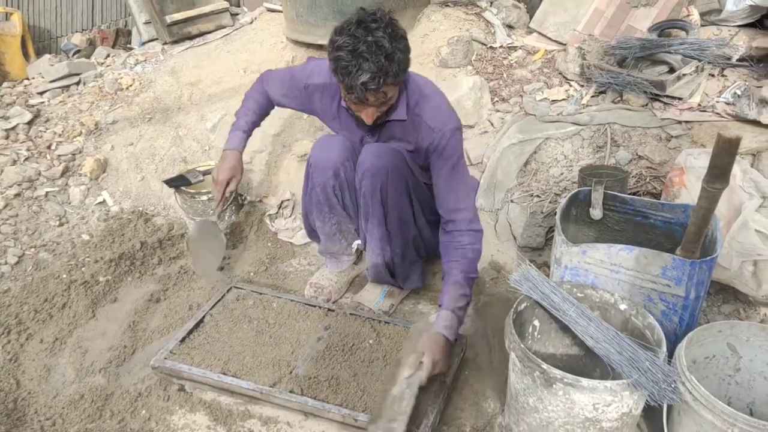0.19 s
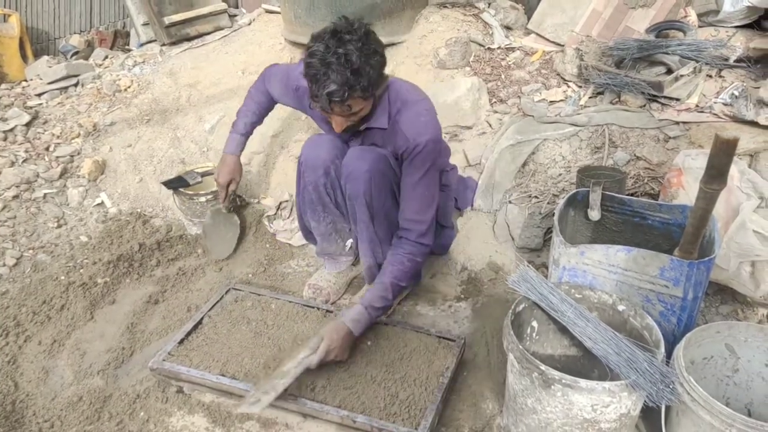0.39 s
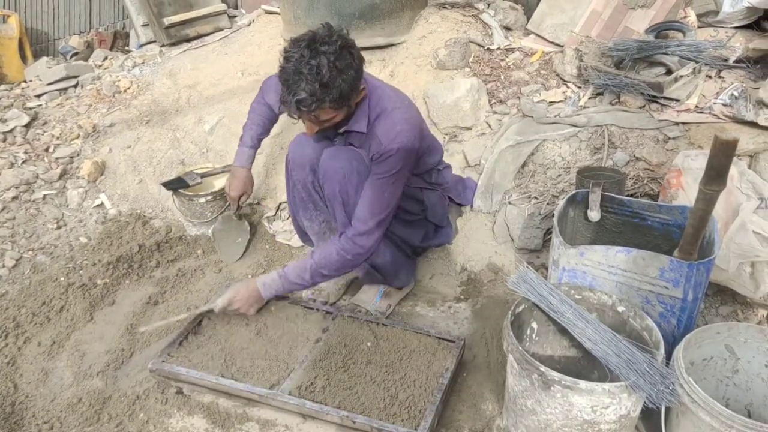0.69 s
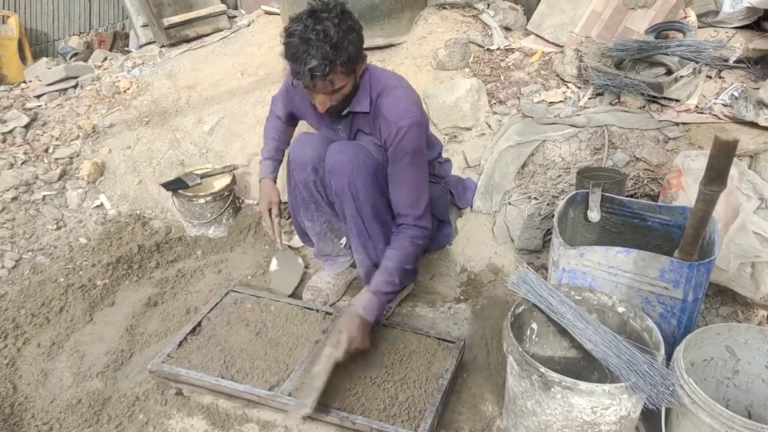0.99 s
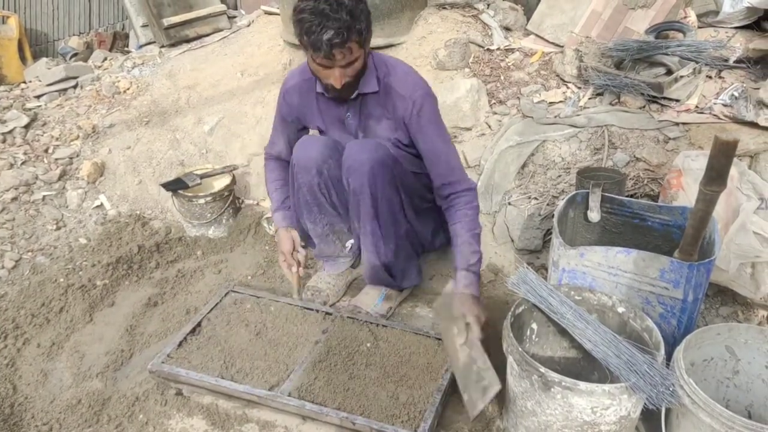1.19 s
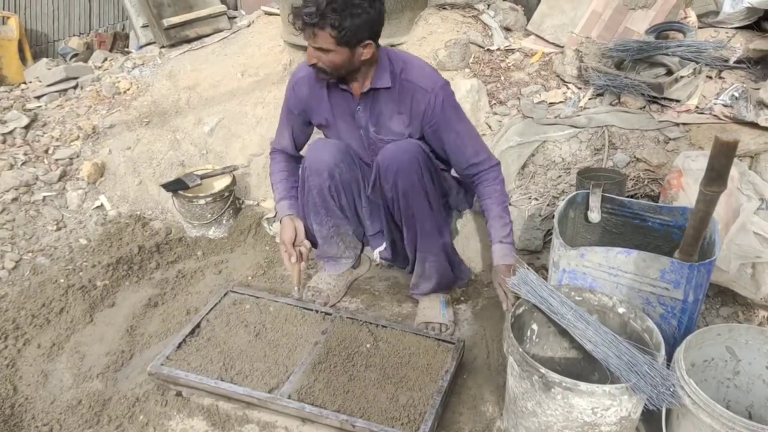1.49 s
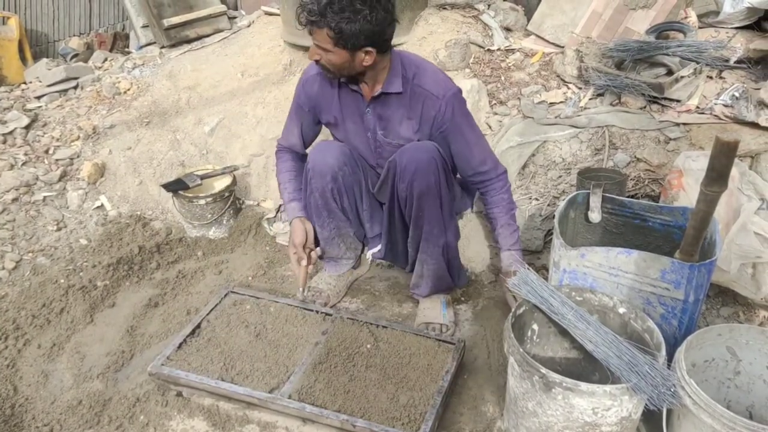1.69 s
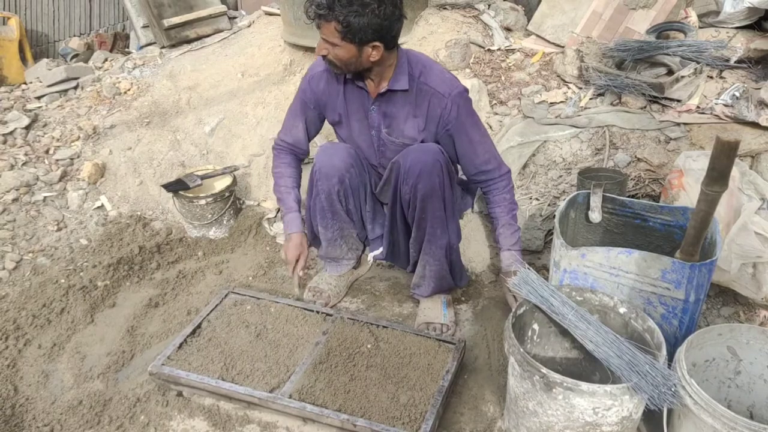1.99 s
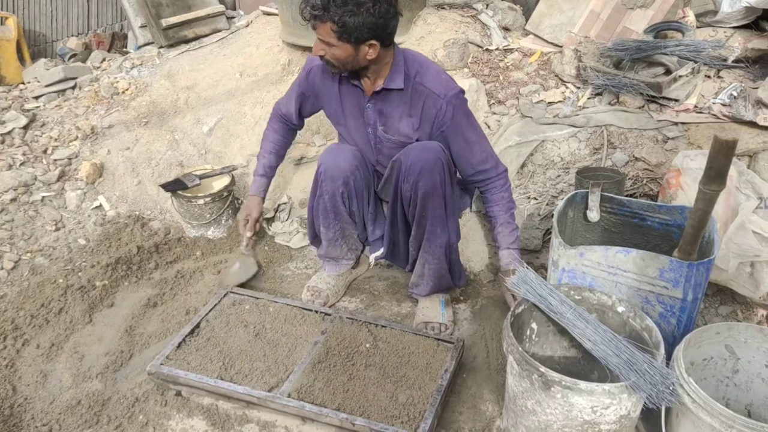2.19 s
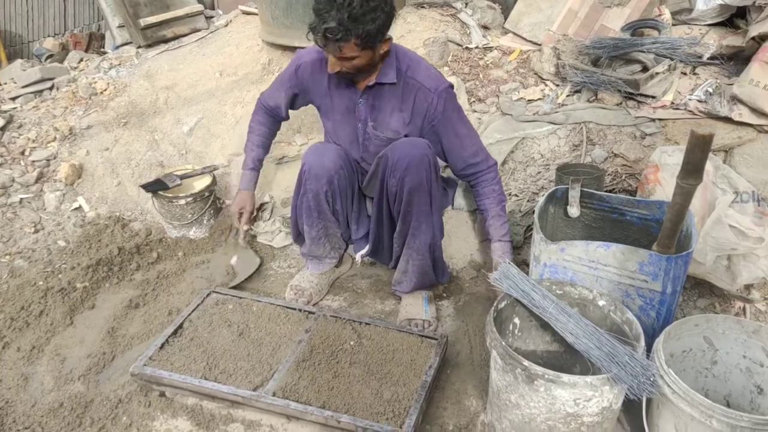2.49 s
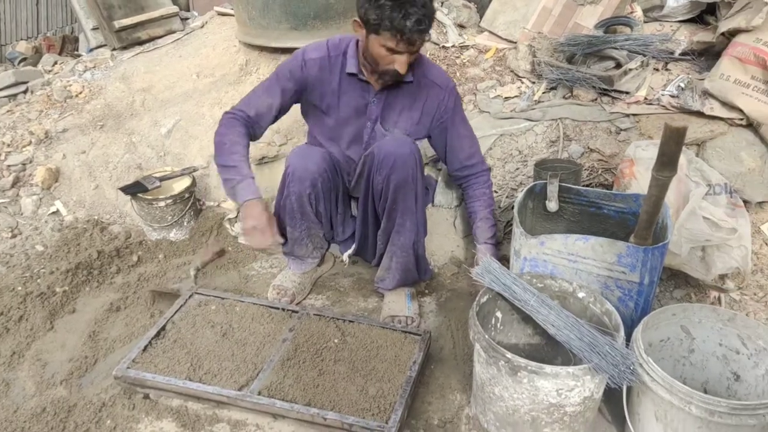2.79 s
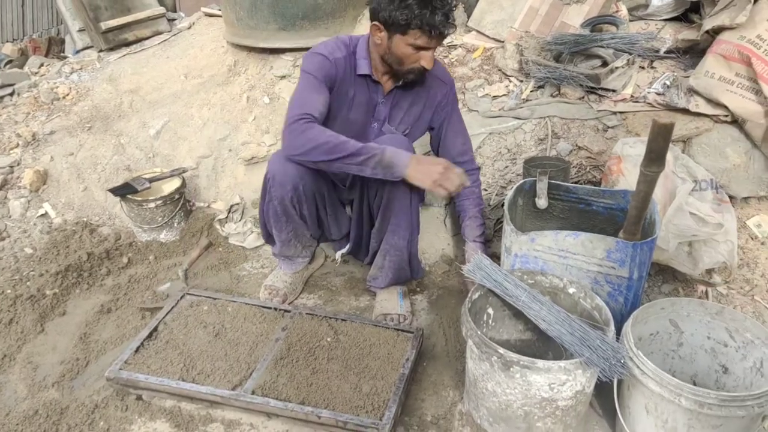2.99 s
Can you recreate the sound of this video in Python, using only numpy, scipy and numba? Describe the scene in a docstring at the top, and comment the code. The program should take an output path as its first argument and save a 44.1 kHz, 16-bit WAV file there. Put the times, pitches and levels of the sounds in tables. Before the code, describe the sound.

A wooden float drags twice over damp sand in a steel mould, rasping and knocking on the rim, then a small trowel scrapes gritty ground and clinks on stones; close phone pickup in a quiet outdoor yard.

```python
"""A wooden float is dragged twice over damp sand and cement in a steel mould and knocks as it is set aside.
A small steel trowel then scrapes the gritty ground twice, clinks on stones and is laid down.
Grains make the scraping noise, short contacts drive decaying modes of ground, wood and steel.
Outdoors in a yard, close by, over quiet air, heard through the two microphone ports of a phone."""
import sys
import numpy as np
from scipy import signal
from scipy.fft import rfft, irfft
from scipy.io import wavfile
from scipy.ndimage import map_coordinates
from numba import njit

SR = 44100
rng = np.random.default_rng(int(sys.argv[2]) if len(sys.argv) > 2 else 0)


def int16_out(signal):
    """Quantize to a 16-bit WAV file."""
    q = np.round(np.clip(np.atleast_2d(signal).T, -1, 1) * 32767)
    wavfile.write(sys.argv[1], SR, q.astype(np.int16))


N = 138915
T = np.arange(N) / SR  # time in s
HZ = np.fft.rfftfreq(2 * N, 1 / SR)  # frequencies of a spectrum of doubled length


def amp(db):
    """Decibels to gain."""
    return 10 ** (np.asarray(db) / 20)


def unit(x):
    """Scale to rms 1."""
    return x / np.sqrt(np.mean(x ** 2))


def wander(rate):
    """Random values joined by lines, so many a second."""
    return np.interp(T * rate, np.arange(N), rng.standard_normal(N))


def at(start, x):
    """Place a short sound in time."""
    first = int(start * SR)
    after = max(N - first - x.shape[1], 0)
    return np.pad(x[:, :N - first], ((0, 0), (first, after)))


def swell(table, axis):
    """Pressure of each stroke: it rises, holds and dies away, at the level of one dB column."""
    power = 0
    for row in table:
        start, end, attack, release = row[:4]
        rise = np.clip((T - start) / attack, 0, 1)
        fall = np.exp(-np.maximum(T - end, 0) / release)
        power = power + (amp(row[axis]) * rise * fall) ** 2
    return np.sqrt(power)


def across(table, axis=1):
    """One column of a table over log frequency."""
    rows = np.array(table)
    return np.interp(np.log(HZ + 1), np.log(rows[:, 0]), rows[:, axis])


def colour(x, points):
    """Causal (minimum-phase) filter with the given spectrum; keeps the power of white noise."""
    cepstrum = irfft(np.log(unit(amp(across(points)))))
    # folding the cepstrum onto positive times makes the filter causal
    cepstrum[1:N] *= 2
    cepstrum[N + 1:] = 0
    return irfft(rfft(x, 2 * N) * np.exp(rfft(cepstrum)))[..., :N]


def ring(x, modes):
    """Drive decaying modes; keeps the power of white noise."""
    t = T[:SR // 4]
    response = 0
    for hz, db, t60 in modes:
        decay = np.exp(-np.log(1000) * t / t60)
        response = response + amp(db) / np.sqrt(t60) * np.cos(2 * np.pi * hz * t) * decay
    edges = [modes[0][0] * .88, min(modes[-1][0] * 1.15, SR / 3)]
    response = signal.sosfilt(signal.butter(3, edges, "band", fs=SR, output="sos"), response)
    return signal.fftconvolve(x, response[None] / np.linalg.norm(response), axes=1)[:, :N]


def held(modes, length, pitch=1):
    """Grip and contact scale the ring time and the pitch of modes."""
    return [(hz * pitch, db, t60 * length) for hz, db, t60 in modes]


@njit
def svf(x, hz, width):
    """State-variable band-pass with a moving centre."""
    y, band, low = np.empty(len(x)), 0., 0.
    for i in range(len(x)):
        g, k = np.tan(np.pi * hz[i] / SR), width / hz[i]
        v = (band + g * (x[i] + 1e-18 - low)) / (1 + g * (g + k))
        band, low, y[i] = 2 * v - band, low + 2 * g * v, k * v
    return y


def resonance(x, path, width_hz):
    """One resonance along (s, Hz); keeps the power of white noise."""
    hz = np.interp(T, *np.array(path, float).T)
    filtered = np.array([svf(row, hz, float(width_hz)) for row in x])
    return filtered * np.sqrt(SR / np.pi / width_hz)


SHARP_GRAINS_DB = 0  # snaps against crumbling


def grit(rate, spread_db, grain_s, judder_db, judder_rate):
    """Unequal grains snap and crumble under an edge that sticks and slips; direct and scattered sound."""
    loudness = amp(spread_db * np.clip(rng.standard_normal(N), -2, 2))
    sizes = (rng.random(N) < rate / SR) * loudness
    power = signal.lfilter([1], [1, -np.exp(-2 / (grain_s * SR))], sizes ** 2)
    crumble = unit(np.sqrt(power) * rng.standard_normal((2, N)))
    snap = unit(sizes * np.sign(rng.standard_normal((2, N))))
    judder = amp(judder_db * wander(judder_rate))
    return unit((crumble + amp(SHARP_GRAINS_DB) * snap) * judder)


PATCH_DB, PATCH_S, PATCH_HZ = 4.4, .03, 220  # depth and spacing of the random level field


def patchy(x, size=512):
    """Narrow bands of the scraping noise swell and fade at random."""
    hz, times, bins = signal.stft(x, SR, nperseg=size)
    field = rng.standard_normal((int(SR / 2 / PATCH_HZ) + 3, int(N / SR / PATCH_S) + 3))
    places = np.meshgrid(hz / PATCH_HZ, times / PATCH_S, indexing="ij")
    db = PATCH_DB * map_coordinates(field, places, order=2, mode="nearest")
    return unit(signal.istft(bins * amp(db), SR, nperseg=size)[1][:, :N])


def blow(contact_s, size=2048):
    """A short gritty contact that builds and dies away; direct and scattered sound."""
    age = T[:size] / contact_s
    return rng.standard_normal((2, size)) * 2 * np.sqrt(age) * np.exp(-age)


GRITTY_DB, CUSHION_HZ = -4, 3300  # gritty share of a strike; low-pass of its impact


def strike(contact_s):
    """A gritty contact with one firm, slightly cushioned impact near its peak."""
    gritty = blow(contact_s)
    impact = np.zeros_like(gritty)
    impact[0, int(contact_s / 2 * SR)] = np.sqrt(contact_s * SR)
    cushion = signal.butter(2, CUSHION_HZ, fs=SR, output="sos")
    return amp(GRITTY_DB) * gritty + signal.sosfilt(cushion, impact)


# Spectrum of the open air around the yard: frequency_hz, relative level_db
AIR_SPECTRUM = [(25, -38), (60, 2.5), (330, 5.5), (550, -2.5), (1200, -14), (2700, -10), (3600, -19),
                (6000, -24.5), (15000, -36)]
# Level of that air before the microphone ports: time_s, level_db
AIR_LEVEL = [(0, -67), (1, -66), (2.5, -68)]


def outdoor_air():
    """Quiet outdoor air: steady coloured noise, its level drifting slightly."""
    level = amp(np.interp(T, *np.array(AIR_LEVEL).T))
    return level * colour(rng.standard_normal((2, N)), AIR_SPECTRUM)


# Pushes of the float, close by, levels relative before each layer's trim:
# start_s, end_s, attack_s, release_s, rumble_db, crunch_db, hiss_db, wood_db, rasp_db
PUSHES = [(.191, .31, 0.0052, 0.047, -48, -38, -42, -81, -38),
          (.31, .54, 0.035, 0.086, -35, -33, -39.5, -45, -60.5),
          (.55, .83, 0.12, 0.039, -39.5, -32.5, -41.5, -40.5, -66),
          (1.043, 1.055, 0.001, 0.01, -40, -44, -50, -48.5, -90),
          (1.135, 1.365, .008, 0.0062, -43.5, -33.5, -37, -70.5, -35.5),
          (1.33, 1.585, 0.036, 0.042, -42.5, -38, -47, -71, -51.5),
          (1.675, 1.765, 0.031, 0.028, -35, -38, -46, -81, -70.5),
          (1.878, 1.94, 0.0061, 0.055, -43, -50.5, -61, -61.5, -61)]
# Modes of the packed bed: pitch_hz, relative level_db, t60_s (float knocks scale pitch and t60)
GROUND_THUD = [(128, -19.5, 0.046), (222, -2.5, 0.18), (281, 4, 0.11), (330, 7, 0.1), (430, -17.5, .02)]
# Hollow note under the float: time_s, centre_hz
HOLLOW = [(.3, 266), (.42, 232), (.55, 250), (.66, 320), (.76, 233), (1.3, 280), (1.41, 189), (1.5, 250),
          (1.6, 205), (1.69, 334), (1.92, 335)]
# Spectrum of the crunching sand: frequency_hz, relative level_db
CRUNCH = [(60, -28), (200, -12.5), (420, 3), (620, -1), (850, 3.5), (1100, 0), (1600, 3.5), (2100, 3.5),
          (2600, 8.5), (3300, -3.5), (4200, -1), (6000, -26)]
# Rasp of the float's edge on the rim: time_s, centre_hz
RASP = [(.2, 2850), (.26, 3110), (.38, 2450), (0.849, 2280), (1.14, 2160), (1.18, 2600), (1.21, 2940),
        (1.27, 2940), (1.304, 3310), (1.335, 2800)]
# Modes of the wooden float: pitch_hz, relative level_db, t60_s (knocks scale pitch and t60)
WOOD = [(805, -2, .035), (985, 4, .06), (1390, -9, .04), (1590, -4, .04)]
# Lower squeal of the edge, rising overall as the float is drawn back: time_s, centre_hz
SQUEAL = [(1.14, 1290), (1.19, 1555), (1.24, 1510), (1.265, 1750), (1.31, 1943)]
# Pressure of the squeal: start_s, end_s, attack_s, release_s, level_db
SQUEAL_PUSH = [(1.14, 1.32, 0.013, .02, -40.5)]
# Modes of the steel mould: pitch_hz, relative level_db, t60_s (knocks scale t60)
MOULD = [(1485, 0, .14), (1546, 6.5, 0.067), (1848, 6.5, 0.055), (1940, 3.5, 0.078), (2336, 7, .05),
         (2762, 14.5, 0.075), (3140, -8, 0.084)]
# Spectrum of the sand's hiss: frequency_hz, relative level_db
HISS = [(2000, -16), (3600, -8.5), (4500, 11.5), (5200, 1), (6100, 3.5), (7000, -8.5), (8600, -7.5),
        (9800, -27), (15000, -24)]
RUMBLE_DB, HOLLOW_DB, CRUNCH_DB, MOULD_DB, SAND_HISS_DB = -5.5, -7, -0.5, -21, -2.5
HOLLOW_WIDTH_HZ, RASP_WIDTH_HZ, SQUEAL_WIDTH_HZ = 36, 142, 30


def float_strokes():
    """Sand crunches and hisses, the wood sounds, the edge rasps on the mould, the packed bed rumbles."""
    rumble, crunch, hiss, wood, rasp = (swell(PUSHES, axis=k) for k in range(4, 9))
    sand = patchy(grit(rate=2200, spread_db=4.6, grain_s=.0004, judder_db=1.4, judder_rate=240))
    lumps = rumble * grit(rate=350, spread_db=2.5, grain_s=.002, judder_db=1, judder_rate=40)
    drag = sand * crunch
    bed = amp(RUMBLE_DB) * ring(lumps, GROUND_THUD)
    hollow = amp(HOLLOW_DB) * resonance(lumps, HOLLOW, HOLLOW_WIDTH_HZ)
    crunching = amp(CRUNCH_DB) * colour(drag, CRUNCH)
    rasping = resonance(sand * rasp, RASP, RASP_WIDTH_HZ)
    wooden = ring(sand * wood, WOOD)
    squeal = resonance(sand * swell(SQUEAL_PUSH, axis=4), SQUEAL, SQUEAL_WIDTH_HZ)
    mould = amp(MOULD_DB) * ring(drag, MOULD)
    hissing = amp(SAND_HISS_DB) * colour(sand * hiss, HISS)
    return bed + hollow + crunching + rasping + wooden + squeal + mould + hissing


# Knocks of the float, close by, levels relative before each layer's trim:
# start_s, thud_db, wood_db, steel_ring_db, crack_db, contact_s, pitch_factor (ground and wood),
# ring_length_factor (ground, wood and steel)
KNOCKS = [(1.042, -55, -28, -47, -29.5, 0.0028, 0.87, 0.35),
          (1.087, -44, -33, -22.5, -21.5, 0.0033, 0.76, 0.52),
          (1.103, -28, -17.5, -25.5, -19.5, 0.0033, 0.92, 0.25),
          (1.129, -28, -34, -19.5, -8, 0.0025, 1.12, 0.32), (1.321, -38, -38, -12, -32, 0.0019, 0.91, 0.59),
          (1.355, -32.5, -29.5, -46, -20.5, 0.0076, .92, 0.43),
          (1.535, -26, -29, -32, -39, 0.002, 0.89, 1.2), (1.569, -23, -14.5, -22, -31, 0.0036, .93, 0.83),
          (1.637, -35, -52, -39, -42, 0.0028, 0.98, 1.1), (1.757, -36.5, -25, -19.5, -31, .003, 0.89, 0.5),
          (1.927, -31.5, -53, -35.5, -31, 0.003, 1.18, 0.45),
          (1.944, -29, -21, -30.5, -33, 0.0042, 1.005, 0.96),
          (2.005, -32.5, -50, -42, -46, 0.0021, .9, 0.66), (.662, -15.5, -40, -47, -48, 0.00071, 1.1, 0.6),
          (.809, -25, -19, -24, -26, 0.0014, 1.32, 0.59), (.897, -53, -41, -36.5, -52, .0035, 0.71, 1)]
# Spectrum of cracking grit, under float and trowel alike: frequency_hz, relative level_db
CRACK = [(100, -37.5), (1000, -12), (2500, 10), (4400, 1), (6200, 0.5), (7500, -7), (8700, -7.5),
         (10000, -20.5), (15000, -16)]


def float_knocks():
    """Each knock thumps the ground, sounds the wood, rings the sand-damped mould and cracks some grit."""
    body = crack = 0
    for start, thud_db, wood_db, steel_db, crack_db, contact_s, pitch, length in KNOCKS:
        push = strike(contact_s)
        thud = amp(thud_db - 2.5) * ring(push, held(GROUND_THUD, length, pitch))
        wood = amp(wood_db - 7.0) * ring(push, held(WOOD, length, pitch))
        steel = amp(steel_db - 2.5) * ring(push, held(MOULD, length))
        body = body + at(start, thud + wood + steel)
        crack = crack + amp(crack_db) * at(start, blow(contact_s))
    return body + amp(-10.5) * colour(crack, CRACK)


# Modes of the trowel's blade before the touched spot tilts their levels and pressing shortens them:
# pitch_hz, relative level_db, t60_s
BLADE = [(907, -5, 0.15), (1494, 7.5, 0.12), (1758, 1, 0.12), (1975, 1, 0.11), (2320, 2.5, 0.066),
         (2690, 5.5, 0.069), (2740, 6, .19), (3820, 7.5, 0.029), (4490, 5, 0.035), (5770, 1.5, .08)]
SPOT_DB_PER_OCTAVE, SPOT_SCATTER_DB = 8.5, 1


def blade_modes(favoured_hz, length=1):
    """The spot that is touched favours the modes near one pitch, with random scatter each time."""
    chance = rng.standard_normal(len(BLADE))
    modes = []
    for (hz, db, t60), scatter in zip(BLADE, chance):
        tilt_db = SPOT_DB_PER_OCTAVE * abs(np.log2(hz / favoured_hz))
        modes.append((hz, db - tilt_db + SPOT_SCATTER_DB * scatter, t60 * length))
    return modes


# Clinks of the trowel on stones, close by, levels relative (cracks before their trim):
# start_s, blade_ring_db, chink_db, chink_centre_hz, chink_t60_s, crack_db
CLINKS = [(2.032, -29, -33, 1560, 0.0098, -33), (2.052, -42, -41, 1530, .03, -35.5),
          (2.13, -23.5, -22.5, 1502, 0.1, -22.5), (2.166, -23.5, -21.5, 1496, 0.028, -37),
          (2.199, -29.5, -16, 2160, 0.008, -24.5), (2.214, -22.5, -22.5, 3036, 0.034, -34),
          (2.333, -23.5, -16.5, 2480, 0.018, -24), (2.57, -25.5, -29, 2460, .015, -36),
          (2.697, -17.5, -5, 2810, .016, -22.5), (2.745, -22.5, -25.5, 2550, 0.056, -37),
          (2.768, -22.5, -28, 2360, 0.058, -33), (2.791, -39, -41, 4060, 0.0089, -25),
          (2.814, -24.5, -26, 3780, .015, -18), (2.85, -29.5, -19, 2690, 0.027, -27),
          (2.988, -42.5, -38, 2733, 0.052, -37), (3.05, -58, -56, 2610, 0.037, -41)]
CLINK_CONTACT_S, CRACK_S = 0.00099, 0.0028
HANDLE_S, HANDLE_DB = 2.825, -48  # the handle drops on the sand


def trowel_clinks():
    """The blade catches stones: crack, damped chink pitched by the spot, free ring; the handle thuds down."""
    steel = crack = 0
    age = T[:SR // 8]
    for start, ring_db, chink_db, hz, t60, crack_db in CLINKS:
        fade = (1 - np.exp(-age / CLINK_CONTACT_S)) * np.exp(-np.log(1000) * age / t60)
        phase = 2 * np.pi * hz * age
        chink = fade * np.array([np.sin(phase), np.cos(phase)])  # direct and scattered
        free_ring = ring(strike(CLINK_CONTACT_S), blade_modes(hz))
        steel = steel + at(start, amp(chink_db) * chink) + at(start, amp(ring_db) * free_ring)
        crack = crack + amp(crack_db) * at(start, blow(CRACK_S))
    handle = amp(HANDLE_DB) * at(HANDLE_S, ring(strike(0.00513), GROUND_THUD))
    return steel + handle + amp(-8.5) * colour(crack, CRACK)


# Scrapes of the trowel, close by, levels relative before each layer's trim:
# start_s, end_s, attack_s, release_s, grinding_db, hiss_db, blade_ring_db, favoured_hz
SCRAPES = [(2.127, 2.176, .0017, 0.0065, -42.5, -60.5, -69, 1500),
           (2.21, 2.323, 0.0069, 0.015, -39, -43, -35.5, 2060),
           (2.522, 2.691, 0.044, 0.008, -36, -47, -39.5, 2360),
           (2.70, 2.832, 0.048, 0.006, -41.5, -56, -50, 2720)]
# Spectrum of the grinding grit: frequency_hz, relative level_db
GRIND = [(100, -51.5), (330, -4), (560, -11.5), (900, -4), (1100, -6.5), (1500, 5.5), (2100, -9),
         (3000, 2.5), (3800, -4.5), (4600, -2), (6500, -22)]
# Rasp of the blade's edge: time_s, centre_hz
BLADE_RASP = [(2.199, 2830), (2.28, 3100), (2.341, 2700), (2.56, 2390), (2.68, 2700), (2.718, 2860),
              (2.75, 2510), (2.789, 2075)]
# Spectrum of the hiss along the blade: frequency_hz, relative level_db
BLADE_HISS = [(2500, -21), (4700, 2), (6200, 4), (7500, -10), (8700, 0), (9800, -17), (12000, -17.5),
              (15000, -19.5)]
GRIND_DB, BLADE_RASP_DB, BLADE_HISS_DB = -2.5, -14.5, 2
PRESSED_RING = 0.44  # share of the ring time left while the blade is pressed down


def trowel_scrapes():
    """Grit grinds along the blade's edge and keeps the blade ringing, differently in each stroke."""
    grind, hiss = swell(SCRAPES, axis=4), swell(SCRAPES, axis=5)
    sand = patchy(grit(rate=3000, spread_db=3.8, grain_s=.0004, judder_db=1.2, judder_rate=150))
    drag = sand * grind
    blade = 0
    for row in SCRAPES:
        blade = blade + ring(sand * swell([row], axis=6), blade_modes(row[-1], PRESSED_RING))
    grinding = amp(GRIND_DB) * colour(drag, GRIND)
    rasping = amp(BLADE_RASP_DB) * resonance(drag, BLADE_RASP, RASP_WIDTH_HZ)
    hissing = amp(BLADE_HISS_DB) * colour(sand * hiss, BLADE_HISS)
    return grinding + rasping + blade + hissing


YARD_DB, YARD_T60_S = -9.5, 0.22


def yard(x):
    """Faint reflections from buckets, rubble and walls: a decaying noise tail."""
    t = T[:SR // 2]
    decay = np.exp(-np.log(1000) * t / YARD_T60_S)
    tail = rng.standard_normal((2, len(t))) * decay * (t > .006)  # starts after 6 ms
    return amp(YARD_DB) * signal.fftconvolve(x, tail / np.linalg.norm(tail[0]), axes=1)[:, :N]


# The phone's two microphone ports:
# frequency_hz, left_over_right_db, likeness (0-1), left_lead_rad
PORTS = [(130, 0, .996, 0), (380, .3, .988, 0), (850, -.5, .92, .05), (1400, .5, .8, -.4),
         (1950, 3, .55, -1.2), (2500, 12, .55, -2.3), (3100, 12, .6, -2.4), (3800, 3, .4, -3.9),
         (5200, -7, .25, -6), (6200, -7, .65, -6.28), (7400, -1, .65, -6.28), (8600, 4, .45, -6.28),
         (10500, -1, .65, -6.28)]


def ports(x):
    """Direct sound reaches both ports, scattered sound sets them apart; balance and phase vary with pitch."""
    balance, lead = amp(across(PORTS, axis=1)), across(PORTS, axis=3)
    likeness = np.clip(across(PORTS, axis=2), 0, 1)
    direct, scattered = rfft(x, 2 * N) * np.sqrt([(1 + likeness) / 2, (1 - likeness) / 2])
    left = (direct + scattered) * balance * np.exp(1j * lead)
    right = direct - scattered
    # expected level of the mean of both ports, divided out to keep it even
    centre = np.sqrt(1 + balance ** 2 + 2 * balance * likeness * np.cos(lead)) / 2
    return irfft(np.array([left, right]) / centre)[:, :N]


def scene():
    """Float and trowel in the yard over quiet outdoor air."""
    work = float_strokes() + float_knocks() + trowel_clinks() + trowel_scrapes()
    return ports(work + yard(work) + outdoor_air())


TOP_HZ = 15900


def record(dry):
    """The phone cuts the top with a steep low-pass."""
    return signal.sosfilt(signal.ellip(10, .2, 80, TOP_HZ, fs=SR, output="sos"), dry)


dry = scene()
out = record(dry)
int16_out(out)
```